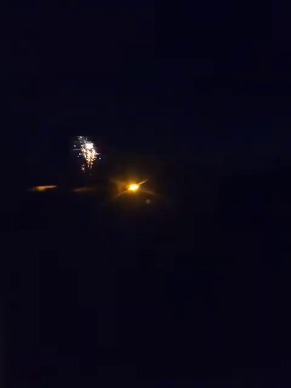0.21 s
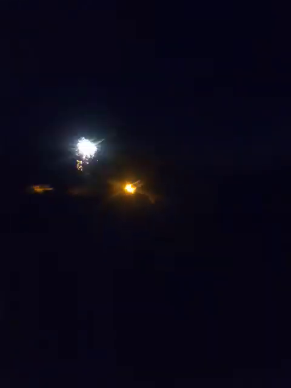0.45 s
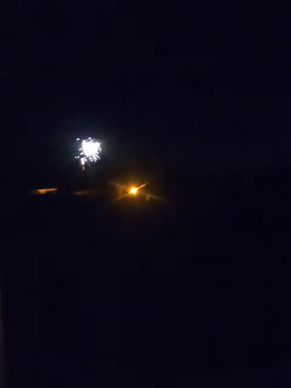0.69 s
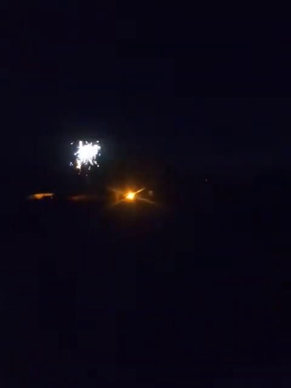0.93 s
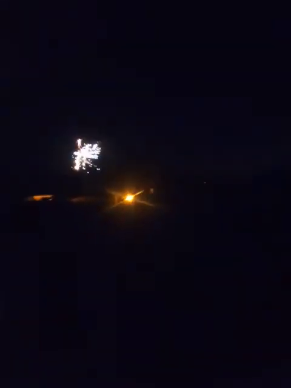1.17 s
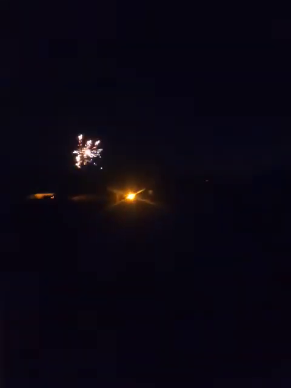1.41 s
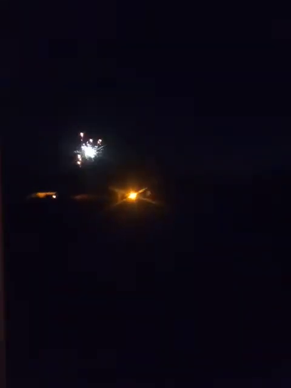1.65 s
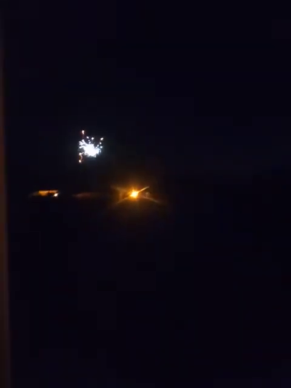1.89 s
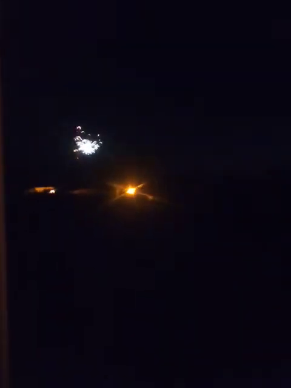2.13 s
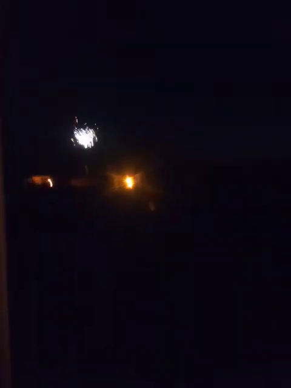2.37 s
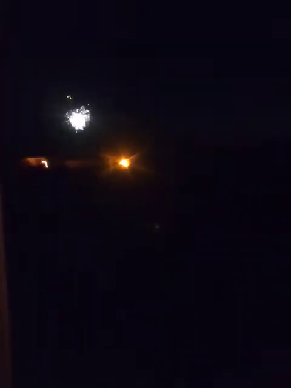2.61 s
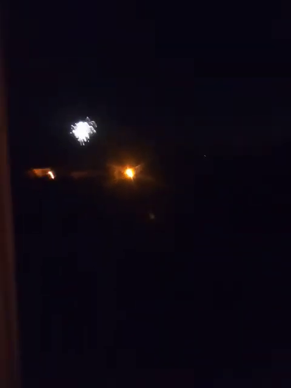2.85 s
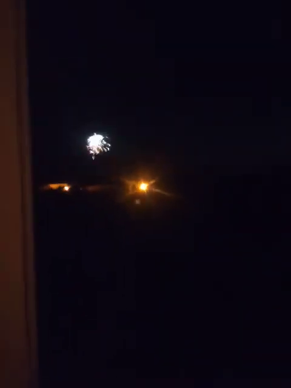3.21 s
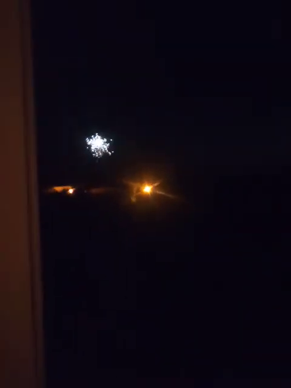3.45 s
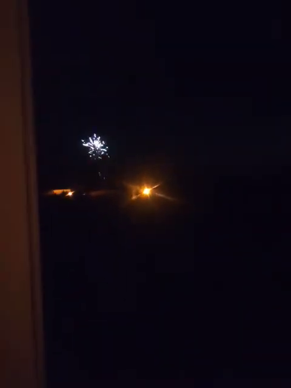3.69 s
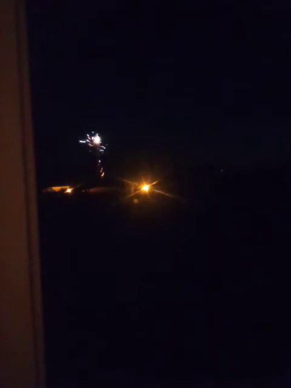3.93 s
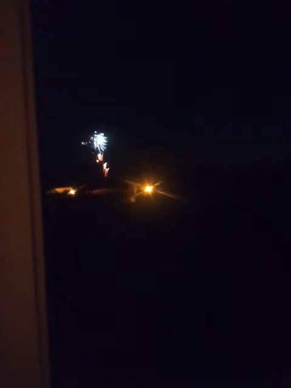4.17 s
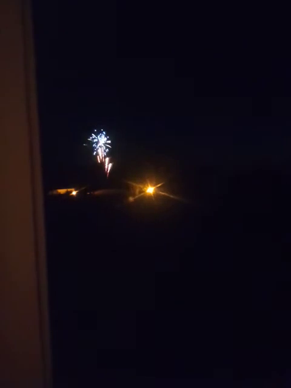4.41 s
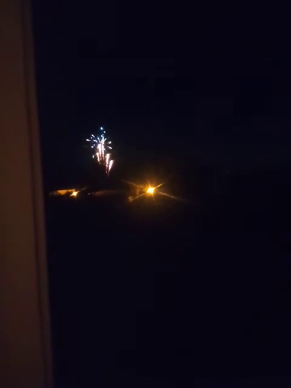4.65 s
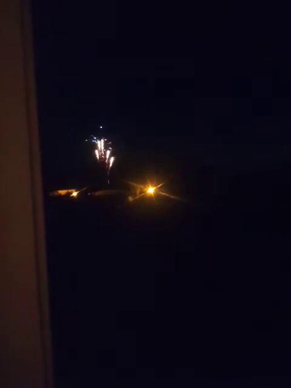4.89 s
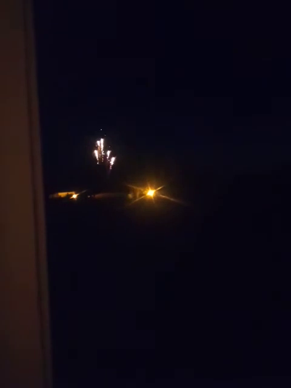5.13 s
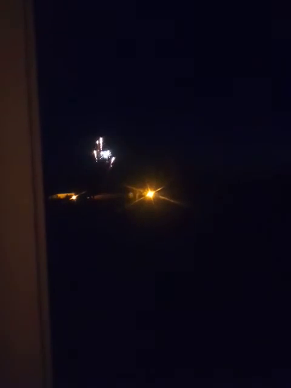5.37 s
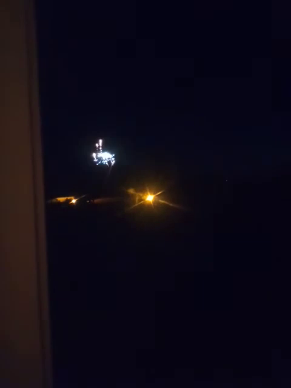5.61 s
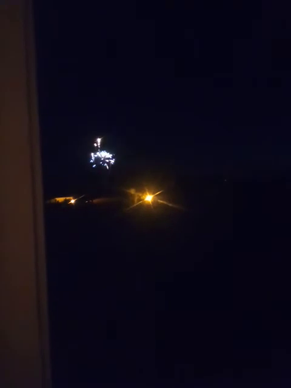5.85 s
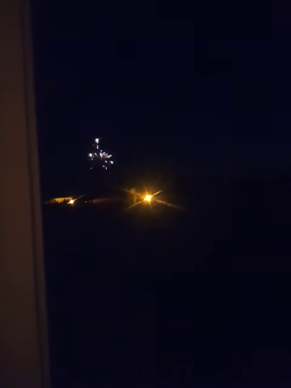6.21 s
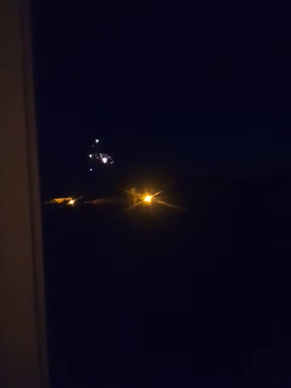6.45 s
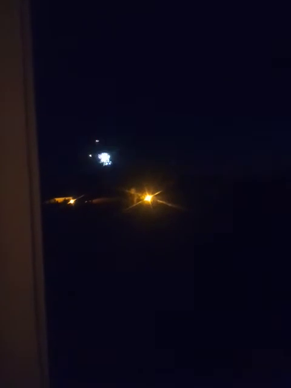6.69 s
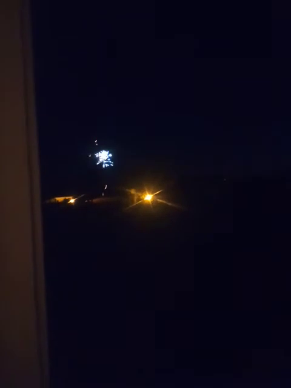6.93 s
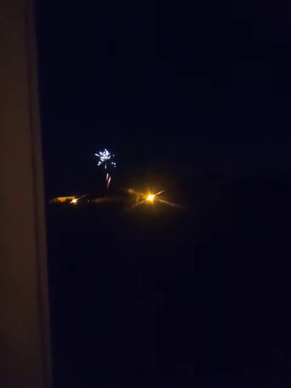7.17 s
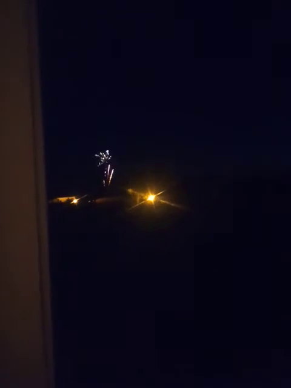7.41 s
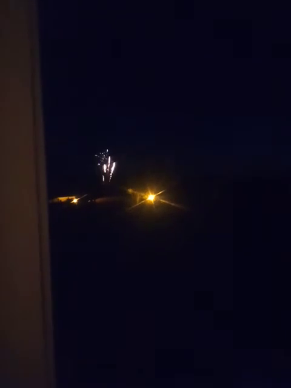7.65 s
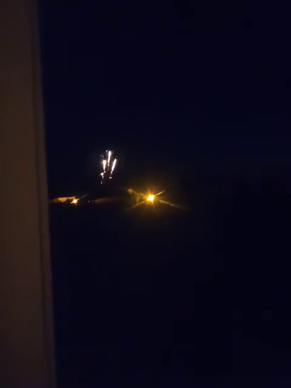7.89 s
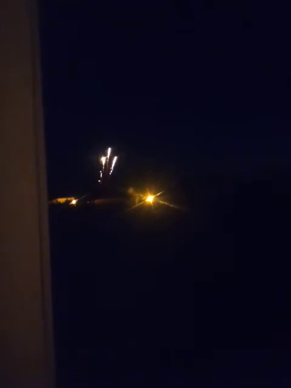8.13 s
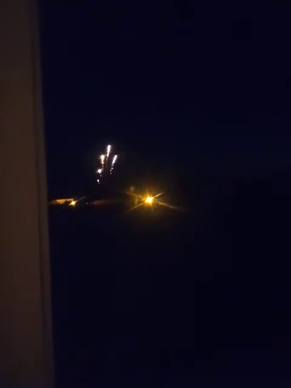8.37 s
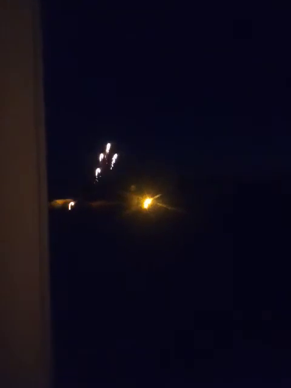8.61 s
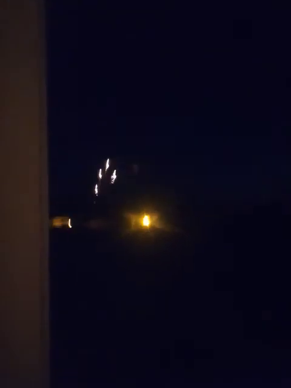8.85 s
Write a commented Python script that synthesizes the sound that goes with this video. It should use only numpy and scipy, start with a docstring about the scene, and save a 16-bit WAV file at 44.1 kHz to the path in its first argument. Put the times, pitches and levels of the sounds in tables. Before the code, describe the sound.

Far-off fireworks heard from a room by an open window at night. Sharp, mid-heavy bangs come in irregular quick succession, two almost together at the start, then thin to isolated shots. Each rattles off the near window surfaces, rings briefly indoors, rolls across the land and returns as a dull knock. Weak pops, faint hum and thin hiss lie underneath; the end is quiet.

```python
"""Distant fireworks at night

Heard from a room through an open window. Each shell sends one sharp blast, a spectrum-shaped pulse that
rattles between the window surfaces, rings in the room, rolls over the land and returns from afar.
Around the bangs lie weak resonant pops, high noise rustles and faint gliding whistles.
A low, wavering hum comes in spells over faint night air and a faint, high, unsteady hiss."""
import sys
import numpy as np
from scipy import signal
from scipy.fft import rfft, irfft
from scipy.io import wavfile
from scipy.ndimage import uniform_filter1d

SR = 44100
rng = np.random.default_rng(int(sys.argv[2]) if len(sys.argv) > 2 else 0)


def file_out(sig):
    """Save sig as 16-bit WAV at sys.argv[1]."""
    # one column per channel
    cols = np.atleast_2d(sig).T
    # limit, then scale
    lim = np.clip(cols, -1, 1)
    pcm = np.round(lim * 32767).astype(np.int16)
    wavfile.write(sys.argv[1], SR, pcm)


N = 397782  # length in samples, about 9 s

# All spectrum tables give relative levels.
# Night air spectrum: pitch_hz, density_db_per_hz
AIR_SPECTRUM = [(25, -9.5), (60, -6.5), (120, 7), (300, -8), (450, -2.5), (750, -3.5), (1100, -17.5),
                (2000, -22), (4000, -19), (6000, -23), (8000, -45), (15000, -34.5)]
# High hiss spectrum: pitch_hz, density_db_per_hz
HISS_SPECTRUM = [(8000, -20.5), (9300, -4.5), (10200, 5.5), (11200, 4.5), (11800, -14), (13500, -21.5),
                 (15300, -17), (16000, -32)]
# Spells of a low hum, perhaps far engines: start_s, length_s, pitch_hz, level_db
HUM_SPELLS = [(.35, 0.92, 117, -56), (1.5, 1.2, 112, -62), (4.95, .85, 123.8, -62),
              (7.68, 1.04, 117, -58.5), (8.55, .2, 133.5, -52), (8.76, 0.46, 116.5, -59)]
# Faint far whistles: start_s, length_s, start_hz, end_hz, level_db
WHISTLES = [(5.76, .23, 1407, 1576, -69.5), (6.657, 0.24, 1434, 1340, -62.5),
            (7.944, 0.085, 1077, 1134, -55)]
# Brief high rustles: start_s, length_s, peak_db
RUSTLES = [(2.39, 0.12, -52), (7.573, 0.034, -57), (7.583, 0.086, -69), (8.0, .14, -79.5),
           (8.16, .16, -76.5)]
# Rustle spectrum: pitch_hz, density_db_per_hz
RUSTLE_SPECTRUM = [(1500, -33.5), (3500, -7), (4650, 9.5), (5200, -6), (5900, 2), (7500, -8), (8500, -45)]
# Weak pops: start_s, level_db, treble_tilt_db_per_octave, resonance_hz
POPS = [(.732, 2.5, -4, 2740), (0.779, 3, -6, 2000), (1.978, 1, -3.5, 2680), (2.062, 2.5, -3, 1930),
        (2.13, 3.5, -3.5, 2502), (5.665, -0.5, -4, 1256), (8.549, -10.5, 4, 1635), (8.925, -13.5, -4, 2450)]
# Pop spectrum: pitch_hz, level_db
POP_SPECTRUM = [(60, -6.5), (140, 0.5), (300, -15), (550, -6), (900, -4.5), (1700, -10.5), (2300, -14),
                (2800, -11), (3300, -23.5), (4000, -15.5), (4700, -30.5), (6500, -28.5), (8500, -57.5)]
# Shell bursts: start_s, level_db, treble_tilt_db_per_octave, crack_db, wall_slap_db, far_echo_db
BANGS = [(0.0765, -1, 0, 5, 2, -15.5), (0.1505, 1, 0.6, 4.5, -2, -5.5), (1.0695, 0, -0.5, -3, -4, -3.5),
         (1.3453, -.5, 0.4, 2, -3, -9), (1.4223, -1.6, -.5, 0.5, -1, -15),
         (1.4697, 0.5, -1.4, -15, -4.5, -13.5), (2.2930, 0, -1, -2, -8, -6.5),
         (2.5567, -1, -1.4, 2, -1.5, -11), (2.9561, 0, -1.5, -.5, -4, -8), (3.2408, 0, .5, -4.5, 2, -9.5),
         (3.5357, 0, -1, 4, -6, -5), (3.9603, 1.5, -0.3, -0.5, 3.5, -2), (4.7965, -0.36, 0.3, 5.5, 3, -4.5),
         (6.1733, -1.5, 0, -0.5, 0.5, -10), (7.3326, -1.45, 0, -3, -2.5, -8.5)]
# The blast after its way through the air: pitch_hz, level_db
BLAST_SPECTRUM = [(25, 7.5), (45, -17.5), (85, 7), (150, 18), (400, 25), (700, 19.5), (1200, 16),
                  (1800, 2.5), (2800, 4), (3800, -7), (5200, -10.5), (8000, -45.5), (16000, -43)]
# Crack of a shock front torn by turbulence: pitch_hz, level_db
CRACK_SPECTRUM = [(40, -35), (300, -11), (1000, 1), (1800, 0.5), (2800, 5), (3800, -8.5), (5000, -10.5),
                  (6200, -20), (7200, -23), (8500, -46.5)]
# Slap from the back wall: pitch_hz, level_db
SLAP_SPECTRUM = [(40, -13.5), (120, 2), (500, 18), (1000, 5.5), (1800, -5.5), (2800, -5), (4500, -15),
                 (7000, -30.5), (8500, -55)]
# Direct sound, then reflections from window frame, pane and near walls: delay_ms, signed_share
NEAR_REFLECTIONS = [(0, 1), (1.52, 0.88), (2.31, -0.43), (3.5, -0.48), (4.07, 0.45), (5.79, 0.4),
                    (6.34, 0.46), (8.59, 0.27), (11.96, -0.26)]
# Colour of the room's diffuse ring: pitch_hz, level_db
ROOM_SPECTRUM = [(25, 0.5), (75, 6), (125, 14.5), (240, 22), (340, 18.5), (450, 31), (560, 18.5),
                 (720, 19.5), (950, 16.5), (1250, 13), (1750, 2), (2800, -2), (5000, -13), (8000, -52)]
# Decay time of the room's ring: pitch_hz, t60_s
ROOM_T60 = [(100, .5), (300, 0.57), (600, 0.45), (2500, .65), (6000, 0.53)]
# Room modes: pitch_hz, relative_level_db, t60_s
ROOM_MODES = [(218, -47.5, 0.97), (264.3, -28, 0.36), (405, -49, 0.19), (450, -50, 0.94),
              (649.6, -30.5, 0.47), (809, -37.5, 0.59), (1195, -37.5, 0.45), (1340, -42.5, 0.26)]
# Scatter from trees and houses: pitch_hz, level_db
LAND_SPECTRUM = [(25, -2), (60, 5.5), (130, 10), (320, 12), (460, 25.5), (560, 20.5), (700, 24), (1000, 14),
                 (1300, 15.5), (1800, 1), (2800, 4.5), (3500, -11), (4600, -12), (7000, -38.5)]
# Blast returned by a distant face: pitch_hz, level_db
FAR_SPECTRUM = [(100, -13), (350, -4), (600, 16), (900, 0), (1300, -4), (1900, -10.5), (3000, -20.5),
                (6000, -49)]
# Returns from distant faces: delay_s, level_db
FAR_RETURNS = [(.215, -11.5), (.32, -10), (.351, -7), (.39, -11.5), (.467, -2.5)]

HUM_ATTACK_S, HUM_RELEASE_S = 0.13, 0.3
# The roll builds up as the blast spreads over the land, then fades evenly
ROLL_DB, ROLL_RISE_S, ROLL_FADE_DB_PER_S = 0.46, 0.09, 21.5
# A distant belt of trees or houses makes it swell once more
BELT_DELAY_S, BELT_SPREAD_S, BELT_DB = 0.37, 0.11, 3
EDGE_HZ = 16500  # top of the recorder's band


def gain_of(db):
    """Turns decibels into an amplitude factor."""
    return 10 ** (np.asarray(db) / 20)


def evened(x):
    """Scales a signal to an rms of one."""
    return x / np.sqrt(np.mean(x ** 2) + 1e-20)


def read(points, hz):
    """Reads a table on a logarithmic frequency axis."""
    table_hz, value = np.transpose(points)
    return np.interp(np.log(hz + 1), np.log(table_hz + 1), value)


def add(mix, start_s, sound):
    """Lays a sound into the mix at its start time."""
    part = mix[max(0, round(start_s * SR)):][:len(sound)]
    part += sound[:len(part)]


def drift(size):
    """Smooth random motion of rms one, changing over about size samples."""
    once_smoothed = uniform_filter1d(rng.standard_normal(N), size)
    return evened(uniform_filter1d(once_smoothed, size))


def noise(points):
    """Steady noise of rms one with the given spectrum."""
    white = rfft(rng.standard_normal(N))
    gains = gain_of(read(points, np.fft.rfftfreq(N, 1 / SR)))
    return evened(irfft(white * gains, N))


def pulse(points, size=4096):
    """A causal, minimum-phase pressure pulse with the given spectrum."""
    hz = abs(np.fft.fftfreq(size, 1 / SR))
    log_gain = read(points, hz) * np.log(10) / 20
    # the Hilbert transform of the log gain supplies the minimum phase
    spectrum = np.exp(np.conj(signal.hilbert(log_gain)))
    return np.fft.ifft(spectrum).real[:size // 2]


def tilted(x, tilt_db):
    """Air takes more or less treble, in dB per octave over the three octaves above 800 Hz."""
    return signal.fftconvolve(x, pulse([(800, 0), (6400, 3 * tilt_db)]))


def scatter(length_s, field_db):
    """A train of random reflections, unit energy a second before a rule over frequency and delay shapes it."""
    spacing = 10  # samples, one reflection in each slot
    taps = np.zeros(int(length_s * SR))
    slots = np.arange(0, len(taps) - spacing, spacing)
    at = slots + rng.integers(0, spacing, len(slots))
    taps[at] = rng.choice([-1., 1.], len(slots)) * np.sqrt(spacing / SR)
    hz, t, grid = signal.stft(taps, SR, nperseg=256)
    shaped = grid * gain_of(field_db(hz[:, None], t))
    return signal.istft(shaped, SR)[1][:len(taps)]


def ring(t60, size=128):
    """A diffuse decay of unit energy whose broad colour is flat."""
    tail = scatter(0.95, lambda hz, t: -60 * t / read(t60, hz))
    spectrum = rfft(tail, 2 * SR)
    broad_power = abs(uniform_filter1d(abs(spectrum) ** 2, size))
    return irfft(spectrum / np.sqrt(broad_power + 1e-20))[:SR]


def splinters(points, t60_s, size=2048):
    """A short random burst of wavelets, flattened in broad colour and given a spectrum."""
    decay = gain_of(-60 * np.arange(size) / SR / t60_s)
    spectrum = rfft(rng.standard_normal(size) * decay, 2 * size)
    spectrum /= np.sqrt(uniform_filter1d(abs(spectrum) ** 2, size=80))
    return signal.fftconvolve(irfft(spectrum)[:size], pulse(points))


def background(air_db=-68, hiss_db=-76, uneven_db=3.0):
    """Faint steady night air and a high hiss of uneven level."""
    air = gain_of(air_db) * noise(AIR_SPECTRUM)
    hiss = gain_of(hiss_db + uneven_db * drift(size=600)) * noise(HISS_SPECTRUM)
    return air + hiss


def hum(waver_hz=1.2, waver_db=1.5):
    """A low, slightly wavering tone that swells, holds and fades in each spell."""
    out, wander_hz = np.zeros(N), waver_hz * drift(size=6000)
    for start_s, length_s, hz, db in HUM_SPELLS:
        t = np.arange(int(length_s * SR)) / SR
        attack = np.minimum(t / HUM_ATTACK_S, 1)
        release = np.minimum((length_s - t) / HUM_RELEASE_S, 1)
        tone = evened(np.sin(2 * np.pi * np.cumsum(hz + wander_hz[:len(t)]) / SR))
        add(out, start_s, gain_of(db) * attack * release * tone)
    return out * gain_of(waver_db * drift(size=3000))


def whistles(blur_t60_s=0.37):
    """Thin gliding tones from far off, blurred by the room."""
    out = np.zeros(N)
    for start_s, length_s, start_hz, end_hz, db in WHISTLES:
        hz = np.linspace(start_hz, end_hz, int(length_s * SR))
        tone = np.sin(2 * np.pi * np.cumsum(hz) / SR)
        add(out, start_s, gain_of(db) * np.hanning(len(hz)) * tone)
    return out + signal.fftconvolve(out, ring([(1000, blur_t60_s)]))[:N]


def rustles():
    """Short swells of high, soft friction noise."""
    swells, fizz = np.zeros(N), noise(RUSTLE_SPECTRUM)
    for start_s, length_s, db in RUSTLES:
        add(swells, start_s, gain_of(db) * np.hanning(int(length_s * SR)))
    return swells * fizz


def pops(width_hz=150, ring_db=6):
    """Weak, blurred pops, each with one resonance, that mostly ring in the room."""
    out = np.zeros(N)
    for start_s, db, tilt_db, hz in POPS:
        blurred = signal.fftconvolve(ring([(1000, 0.35)]), pulse(POP_SPECTRUM))
        pop = tilted(blurred, tilt_db)
        resonance = signal.lfilter(*signal.iirpeak(hz, hz / width_hz, SR), pop)
        add(out, start_s, gain_of(db) * (pop + gain_of(ring_db) * resonance))
    return out


def roll(absorb_db=6.5, lumpy_db=2.4, patchy_db=3.0):
    """Uneven scatter from the land; longer paths lose more treble (absorb_db per second and kHz)."""
    def field_db(hz, t):
        """Level of the roll at each frequency and delay."""
        rise_db = 20 * np.log10(np.clip(t / ROLL_RISE_S, 1e-2, 1) ** 2)
        belt_db = BELT_DB * np.exp(-((t - BELT_DELAY_S) / BELT_SPREAD_S) ** 2)
        fade_db = ROLL_FADE_DB_PER_S * (t - ROLL_RISE_S) + absorb_db * t * hz / 1000
        lumps = evened(uniform_filter1d(rng.standard_normal(len(t)), size=4))
        # paths interfere, so single bands swell and fade, more so in the treble
        patches = evened(uniform_filter1d(rng.standard_normal((len(hz), len(t))), size=24))
        uneven_db = lumpy_db * lumps + patchy_db * patches * hz / (hz + 800)
        return ROLL_DB + rise_db + belt_db - fade_db + uneven_db
    return signal.fftconvolve(scatter(2, field_db), pulse(LAND_SPECTRUM))


def earlier_shell(age_s=0.31, level_db=2):
    """The roll of a burst just before is still dying away at the start."""
    out = np.zeros(N)
    add(out, 0, gain_of(level_db) * roll()[int(age_s * SR):])
    return out


def window(blast, dull_db=-3):
    """A blast and its duller reflections from the surfaces next to the microphone."""
    out = np.zeros(SR)
    add(out, 0, blast)
    for delay_ms, share in NEAR_REFLECTIONS[1:]:  # the first row is the direct sound
        add(out, delay_ms / 1000, share * tilted(blast, dull_db))
    return out


def far_echo(smear_db=-6, room_db=-8):
    """A dull, compact knock from a distant face; it enters by the same window and rings in the room."""
    blast = pulse(FAR_SPECTRUM)
    smear = gain_of(smear_db) * ring([(1000, 0.045)])
    diffuse = smear + gain_of(room_db) * ring(ROOM_T60)
    return window(-blast) + signal.fftconvolve(diffuse, blast)[:SR]


def indoors(room_delay_s=0.008, build_up_s=0.018, modes_db=-1, frame_db=-9):
    """One blast at the microphone: near reflections, fine scatter from the window frame, the room's ring."""
    out, t = window(-pulse(BLAST_SPECTRUM)), np.arange(SR) / SR
    frame = signal.fftconvolve(ring([(1000, 0.069)]), pulse(CRACK_SPECTRUM))
    add(out, 0, gain_of(frame_db) * frame)
    room = signal.fftconvolve(ring(ROOM_T60), pulse(ROOM_SPECTRUM))[:SR]
    for hz, db, t60_s in ROOM_MODES:
        room += gain_of(modes_db + db - 60 * t / t60_s) * np.sin(2 * np.pi * hz * t)
    # the ring swells as more and more walls answer
    swell = 1 - np.exp(-2 * t / build_up_s)
    add(out, room_delay_s, 1.152 * room * swell)
    return out


def fireworks(wall_delay_s=0.0328, crack_t60_s=0.0049, slap_t60_s=0.044):
    """The room answers every shell alike; the crack and the roll over the land differ with each burst's path."""
    out, bang = np.zeros(N), indoors()
    echoes = [far_echo() for _ in FAR_RETURNS]  # each face answers all shells alike
    for start_s, db, tilt_db, crack_db, slap_db, echo_db in BANGS:
        add(out, start_s, gain_of(db) * tilted(bang, tilt_db))
        add(out, start_s, gain_of(crack_db) * splinters(CRACK_SPECTRUM, crack_t60_s))
        add(out, start_s + wall_delay_s, gain_of(slap_db) * splinters(SLAP_SPECTRUM, slap_t60_s))
        add(out, start_s, gain_of(db) * roll())
        for (delay_s, return_db), echo in zip(FAR_RETURNS, echoes):
            add(out, start_s + delay_s, gain_of(echo_db + return_db) * echo)
    return out


def scene():
    """All sources summed at one microphone."""
    quiet_layers = background() + hum() + whistles() + rustles() + pops()
    return (quiet_layers + earlier_shell() + fireworks())[None]


def record(dry):
    """The recorder's band limit: a steep linear-phase low-pass."""
    low_pass = signal.firwin(511, EDGE_HZ, window=("kaiser", 9), fs=SR)
    return signal.oaconvolve(dry, low_pass[None], "same")


dry = scene()
out = record(dry)
file_out(out)
```